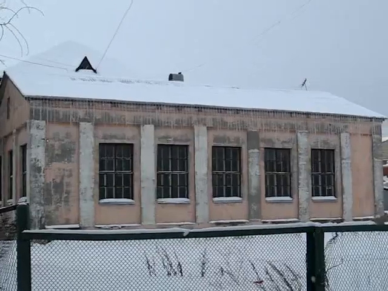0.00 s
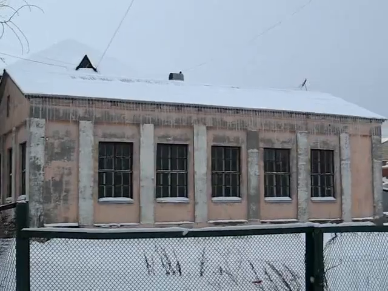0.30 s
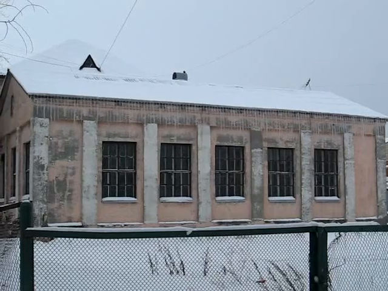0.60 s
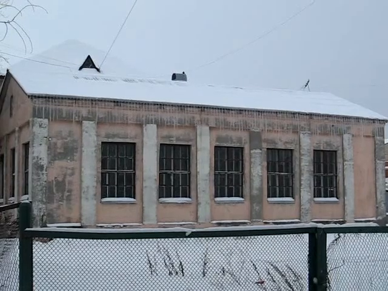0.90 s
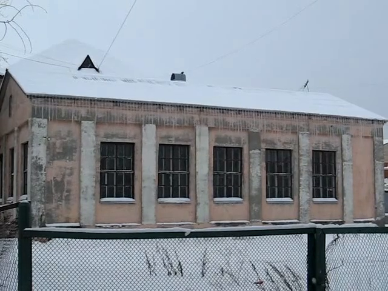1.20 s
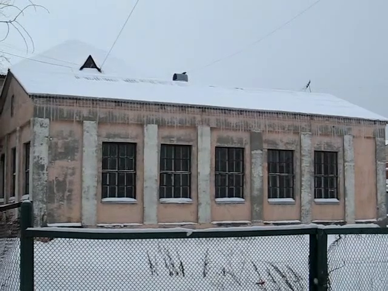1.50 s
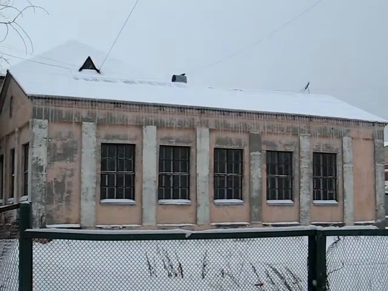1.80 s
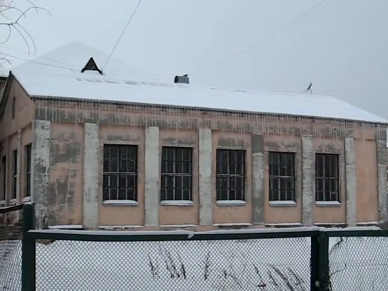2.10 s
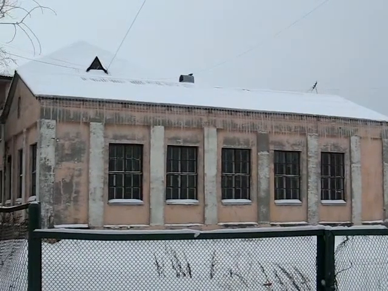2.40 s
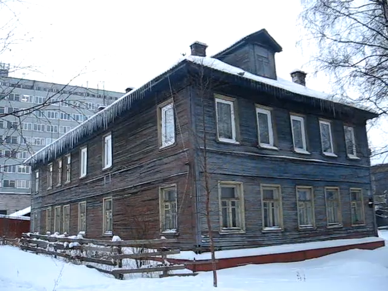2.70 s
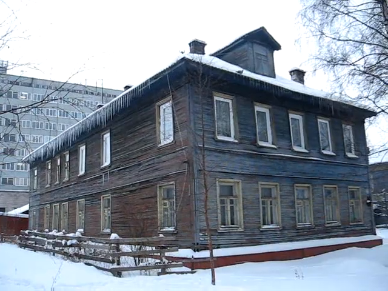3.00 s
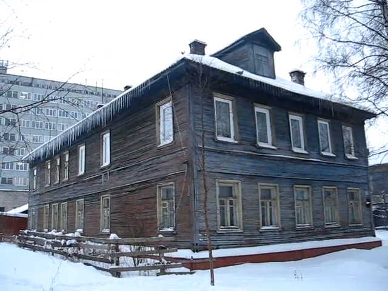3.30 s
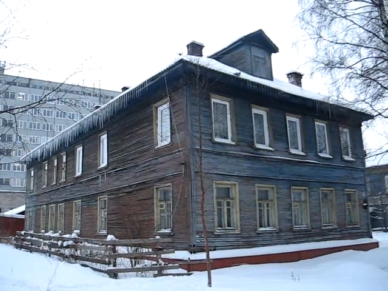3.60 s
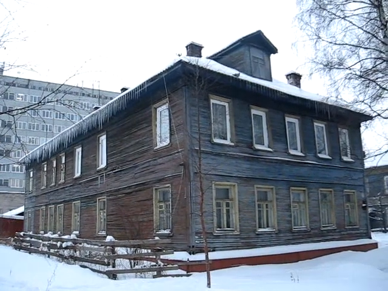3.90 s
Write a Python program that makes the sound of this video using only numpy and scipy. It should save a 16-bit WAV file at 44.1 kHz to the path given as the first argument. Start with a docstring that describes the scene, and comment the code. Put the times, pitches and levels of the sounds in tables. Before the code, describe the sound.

Wind rumbles lightly on the microphone over a distant outdoor wash, with three handling clicks in the first 0.2 seconds. It picks up around 2 seconds, then cuts to silence at 2.4. At 2.6 seconds a pop brings in strong gusts that flap and thump on the microphone until the end at 4 seconds. Small birds chirp faintly throughout with a slight echo, a little nearer after the cut.

```python
"""Winter wind outside old houses

Two scenes from one camera microphone, joined by a short silence and a switching pop. First: a distant
wash, three handling clicks and a light wind that picks up at the end. Second: strong gusts and hard
eddies buffet the microphone over a quiet hiss. Small birds chirp through both, far off and then
nearer, echoing from the house fronts."""
import sys
import numpy as np
from scipy import signal
from scipy.fft import rfft, irfft
from scipy.io import wavfile

SR = 44100
rng = np.random.default_rng(int(sys.argv[2]) if len(sys.argv) > 2 else 0)


def inscribe(sig):
    """Save sig as 16-bit PCM at rate SR to the path in sys.argv[1].

    A 1-D sig is mono; a 2-D sig holds one channel per row.
    Samples are clipped to [-1, 1] before scaling.
    """
    pcm = np.round(np.clip(np.atleast_2d(sig).T, -1, 1) * 32767)
    wavfile.write(sys.argv[1], SR, pcm.astype(np.int16))


N = 176400
T = np.arange(N) / SR
FIRST_END_S, SECOND_START_S = 2.398, 2.5975

# Levels in the tables are relative. Strong wind on the microphone: t/s, level/dB
GUST_STRENGTH = [(2.6, -24), (2.655, -31), (2.685, -21), (2.705, -38), (2.74, -25), (2.765, -59),
                 (2.795, -21), (2.83, -37.5), (2.87, -39), (2.905, -32), (2.94, -40), (2.985, -26),
                 (3.06, -40), (3.11, -27.5), (3.15, -32), (3.23, -32), (3.27, -19.5), (3.305, -47),
                 (3.325, -24.5), (3.355, -43), (3.375, -29), (3.415, -28), (3.45, -46), (3.55, -35.5),
                 (3.57, -42), (3.59, -24.5), (3.635, -37.5), (3.665, -40), (3.695, -25), (3.735, -26.5),
                 (3.77, -42.5), (3.785, -37.5), (3.86, -38.5), (3.895, -40), (3.92, -39.5), (4, -34)]
# Its deep rumble and its brighter flapping: f/Hz, level/dB
RUMBLE_SPECTRUM = [(10, -23.5), (35, -7.5), (78, 0.5), (125, -2), (200, 0), (270, -4.5), (400, -16),
                   (700, -28), (1500, -62)]
FLAP_SPECTRUM = [(100, -9.5), (250, -1), (500, -1.5), (750, -4.5), (1100, -13.5), (1500, -24), (2500, -33),
                 (5000, -53.5)]
# Hard eddies at the capsule: t/s, level/dB, swing time/ms
EDDY_HITS = [(2.276, -16.5, 0.89), (2.5995, -7.5, 0.22), (2.683, -13, 0.23), (2.7195, -14, 0.33),
             (2.799, -36, 0.38), (2.905, -16, 0.19), (2.986, -8.5, 0.75), (3.023, -8.5, 0.31),
             (3.042, -7, 0.64), (3.073, -13.5, 0.32), (3.096, -14.5, 0.28), (3.182, -8.5, 0.49),
             (3.216, -15.5, 0.23), (3.264, -10, 0.435), (3.2795, -11.5, 0.12), (3.32, -11, 0.59),
             (3.372, -14.5, 0.25), (3.4, -13, .25), (3.429, -17, 0.29), (3.594, -9, 1), (3.649, -14, 0.38),
             (3.699, -7, 0.24), (3.726, -8.5, .6), (3.753, -10, 0.51), (3.784, -14.5, 0.31),
             (3.896, -10.5, 0.37)]
# Light wind on the microphone: t/s, level/dB
BREEZE_STRENGTH = [(0, -44.5), (.15, -47), (.23, -36.5), (.4, -47), (.9, -45), (1.03, -39.5), (1.1, -48.5),
                   (1.9, -46), (2.04, -34.5), (2.1, -26.5), (2.21, -41.5), (2.26, -27), (2.32, -34.5),
                   (2.39, -33.5)]
# Its low rumble: f/Hz, level/dB
BREEZE_SPECTRUM = [(10, -14), (30, -1.5), (70, -1.5), (120, -8.5), (250, -16.5), (500, -38), (1500, -60.5)]
# Finger touches on the camera: t/s, level/dB, contact/s, ring relative to level/dB
TOUCHES = [(0.0225, -19, 0.0057, -1), (0.1578, -25, 0.0027, -16), (0.1872, -23.5, .004, -2)]
# The finger's scrape: f/Hz, level/dB
SCRAPE_SPECTRUM = [(100, -10), (350, -2), (600, -2.5), (900, -15.5), (1200, -9), (1650, -3.5), (2200, -7.5),
                   (3000, -10), (3800, -15), (5000, -22.5)]
# Resonances of the camera body: f/Hz, level/dB, t60/s
BODY_MODES = [(533, 8.5, 0.031), (685, -3.5, 0.079), (1800, -18.5, .018), (2750, -16, .02)]
# Bird notes: t/s, length/s, start f/Hz, middle f/Hz, end f/Hz, level/dB
BIRD_NOTES = [(.135, 0.049, 4120, 4230, 4080, -48.5), (0.254, 0.045, 4080, 4130, 4050, -47.5),
              (0.623, 0.095, 4300, 4160, 3860, -44), (.76, 0.056, 3890, 4160, 3930, -41.5),
              (0.796, 0.059, 2500, 2766, 3190, -41), (0.921, 0.048, 3430, 3550, 3920, -44.5),
              (1.205, 0.066, 4070, 4710, 4480, -46), (1.317, 0.073, 4300, 4390, 4660, -45),
              (1.803, 0.052, 4270, 4080, 3850, -39), (1.889, 0.067, 3300, 3410, 3570, -42),
              (1.934, 0.045, 4000, 4150, 3860, -40), (2.751, 0.017, 3140, 3900, 4970, -43),
              (2.767, .036, 3600, 4425, 3700, -43.5), (2.918, 0.026, 2880, 3500, 4570, -43.5),
              (2.959, 0.014, 4410, 3620, 2900, -45.5), (3.13, 0.029, 4410, 3450, 3030, -41.5),
              (3.24, 0.024, 3640, 4680, 2880, -45.5), (3.66, 0.023, 3900, 4400, 3740, -39.5),
              (3.67, 0.021, 3180, 3100, 2440, -38), (3.823, 0.03, 4300, 4450, 4120, -44),
              (3.835, 0.029, 3020, 3570, 3070, -41.5), (3.838, 0.021, 2810, 3060, 2670, -39.5)]
# Birds at two distances: warble depth/fraction of pitch, direct/dB, echo/dB
FAR_BIRDS, NEAR_BIRDS = (.04, -8, -6), (.06, -1, -5.5)
# Distant wash of the first scene: t/s, level/dB
WASH_SWELL = [(0, -45), (.45, -42.5), (.7, -41), (1.6, -41), (2.1, -41), (2.39, -41.5)]
# That wash, and the hiss behind the second scene: f/Hz, level/dB
WASH_SPECTRUM = [(59, -24.5), (100, -11), (156, -7), (230, 0.5), (290, 0.5), (353, -3), (402, 0), (567, 0),
                 (690, 0.5), (1200, -4), (1930, -9.5), (2560, -10.5), (3110, -13.5), (4040, -16),
                 (5000, -24), (6500, -45), (11000, -120)]
HISS_SPECTRUM = [(100, -3.5), (700, -5), (1500, -0.5), (2500, -5.5), (4000, -8), (5000, -16)]


def gusts(rumble_db=-21, flap_db=1.5, rumble_flutter_db=2.97, flap_flutter_db=4):
    """Turbulence right on the microphone shakes a deep rumble a little and a brighter flapping a lot."""
    flutter = np.minimum(wander(rate_hz=110), 1.8)
    strength = follow(GUST_STRENGTH)
    swell = (strength / amp(-31)) ** 0.4  # the rumble follows the gusts only loosely
    rumble = noise(RUMBLE_SPECTRUM) * swell * unit(amp(rumble_flutter_db * flutter))
    flap = noise(FLAP_SPECTRUM) * strength * unit(amp(flap_flutter_db * flutter))
    return (amp(rumble_db) * rumble + amp(flap_db) * flap) * (T > SECOND_START_S)


def eddies(spread_rad=1.49):
    """Each hard eddy at the capsule is a swing of pressure that builds and dies within a cycle or two."""
    out = np.zeros(N)
    for at_s, db, swing_ms in EDDY_HITS:
        phase = (T - at_s) * 1000 / swing_ms
        envelope = np.exp(-np.minimum((phase / spread_rad) ** 2, 100) / 2)
        out += amp(db) * np.sin(phase) * envelope
    return out


def breeze(gain_db=1.5):
    """Light wind rumbles on the microphone in the first scene."""
    return noise(BREEZE_SPECTRUM) * follow(BREEZE_STRENGTH) * amp(gain_db) * (T < FIRST_END_S)


def handling_clicks():
    """Close to the microphone, a finger scrapes the camera and its body rings briefly."""
    out, t = np.zeros(N), T[:SR // 10]
    ring = sum(amp(db - 60 * t / t60) * np.sin(2 * np.pi * hz * t) for hz, db, t60 in BODY_MODES)
    for at_s, db, contact_s, ring_db in TOUCHES:
        scrape = unit(noise(SCRAPE_SPECTRUM)[:round(contact_s * SR)])
        add(out, at_s, amp(db) * scrape * signal.windows.tukey(len(scrape), .3))
        add(out, at_s, amp(db + ring_db) * ring)
    return out


def birds(echo_t60_s=0.21):
    """Short raspy glides, smeared by echoes from the house fronts; farther off in the first scene."""
    direct, echo = np.zeros(N), np.zeros(N)
    warble = wander(rate_hz=715)
    for at_s, length_s, start_hz, middle_hz, end_hz, db in BIRD_NOTES:
        depth, direct_db, echo_db = FAR_BIRDS if at_s < FIRST_END_S else NEAR_BIRDS
        progress = np.linspace(0, 1, round(length_s * SR))
        glide_hz = np.polyval(np.polyfit([0, .5, 1], [start_hz, middle_hz, end_hz], 2), progress)
        hz = glide_hz * (1 + depth * warble[round(at_s * SR):][:len(progress)])
        envelope = np.sqrt(abs(np.sin(np.pi * progress)))
        note = amp(db) * unit(envelope * np.sin(2 * np.pi * np.cumsum(hz) / SR))
        add(direct, at_s, amp(direct_db) * note)
        add(echo, at_s, amp(echo_db) * note)
    tail = rng.standard_normal(SR // 2) * amp(-60 * T[:SR // 2] / echo_t60_s)
    return direct + signal.fftconvolve(echo, tail / np.linalg.norm(tail))[:N]


def background(wash_gain_db=4.5, hiss_db=-42):
    """Far from the microphone: a broad wash in the first scene, a quieter hiss in the second."""
    wash = noise(WASH_SPECTRUM) * follow(WASH_SWELL) * amp(wash_gain_db)
    hiss = noise(HISS_SPECTRUM) * amp(hiss_db)
    return np.where(T < FIRST_END_S, wash, hiss)


def amp(db):
    """Decibels to gain."""
    return 10 ** (np.asarray(db) / 20)


def unit(x):
    """Scales to rms 1."""
    return x / np.sqrt(np.mean(x ** 2) + 1e-20)


def add(mix, at_s, sound):
    """Mixes a sound in at the given time."""
    part = mix[max(round(at_s * SR), 0):][:len(sound)]
    part += sound[:len(part)]


def noise(spectrum):
    """Noise of rms 1 shaped by a spectrum of f/Hz, level/dB."""
    hz, db = np.transpose(spectrum)
    gain = amp(np.interp(np.log(np.fft.rfftfreq(N, 1 / SR) + 1), np.log(hz), db))
    return unit(irfft(rfft(rng.standard_normal(N)) * gain, N))


def wander(rate_hz):
    """Smooth random motion of rms 1, up to about the given rate."""
    rolloff = np.exp(-(np.fft.rfftfreq(N, 1 / SR) / rate_hz) ** 2)
    return unit(irfft(rfft(rng.standard_normal(N)) * rolloff, N))


def follow(curve):
    """Gain along a curve of t/s, level/dB."""
    return amp(np.interp(T, *np.transpose(curve)))


def lowpass(x, hz):
    """Steep band limit."""
    return signal.oaconvolve(x, signal.firwin(301, hz, window=("kaiser", 8), fs=SR), "same")


def scene():
    """Everything that reaches the microphone outside the houses, in mono."""
    return (gusts() + eddies() + breeze() + handling_clicks() + birds() + background())[None]


def record(dry, pop_db=0.5, tick_db=-7.5, pop_decay_s=.00006, fade_s=.004):
    """A narrow-band camera falls silent between the scenes and restarts with a pop and a bright tick."""
    running = (T < FIRST_END_S) | (T > SECOND_START_S)
    fade_out = np.minimum((T[-1] - T) / fade_s, 1)
    pop = np.zeros(N)
    add(pop, SECOND_START_S, -np.exp(-T[:SR // 100] / pop_decay_s))
    narrow = lowpass(dry[0] * running * fade_out + amp(pop_db) * pop, hz=5100)
    return lowpass(narrow + amp(tick_db) * pop, hz=16500)[None]


dry = scene()
out = record(dry)
inscribe(out)
```